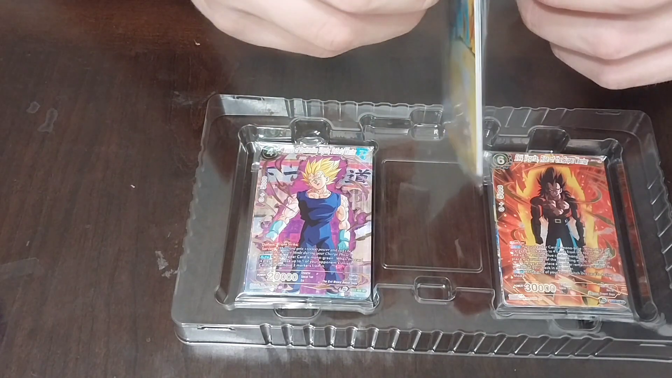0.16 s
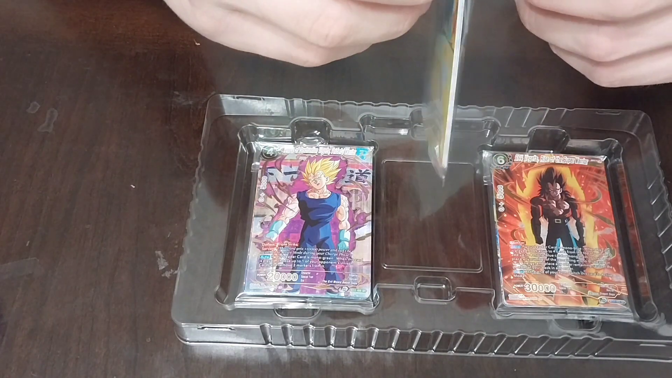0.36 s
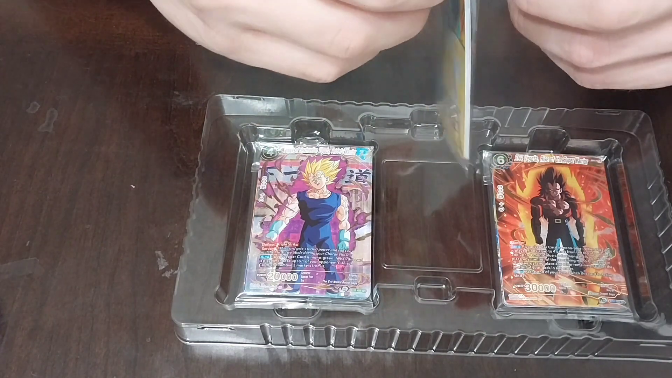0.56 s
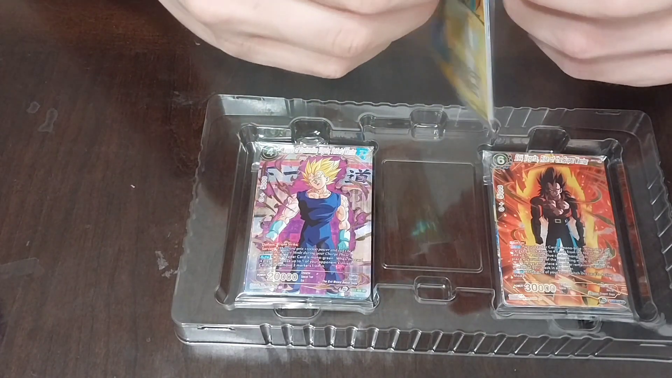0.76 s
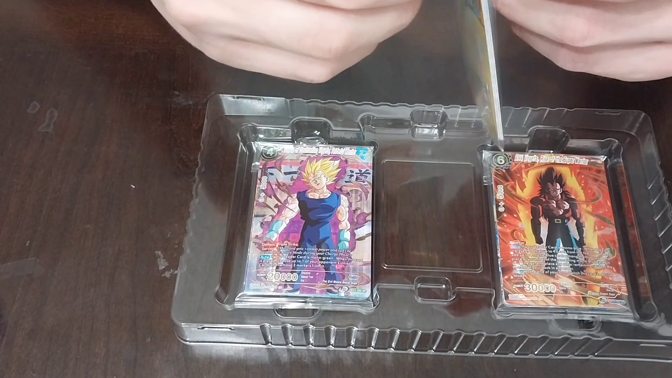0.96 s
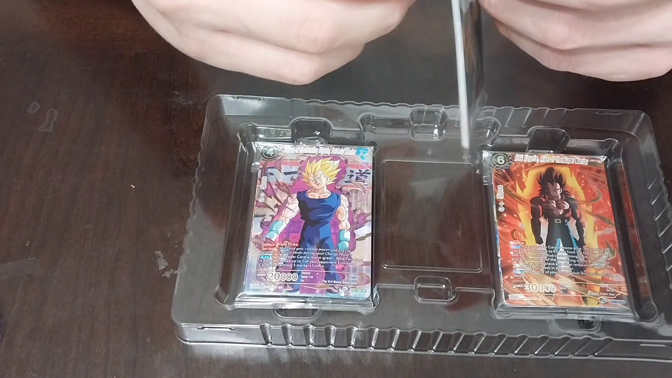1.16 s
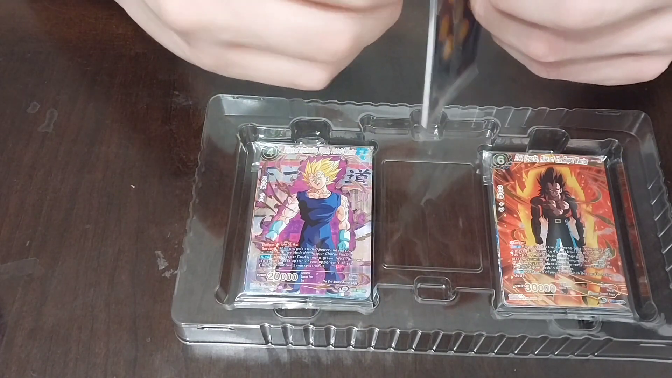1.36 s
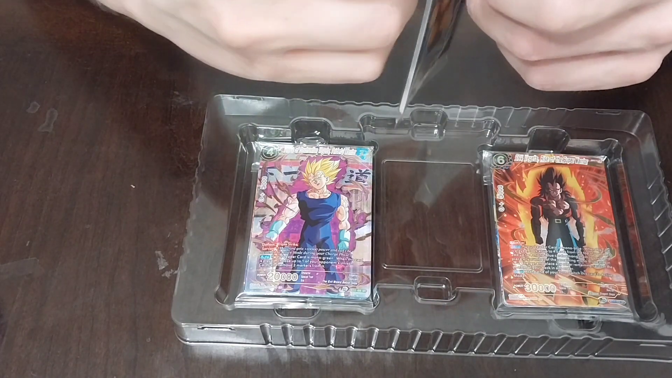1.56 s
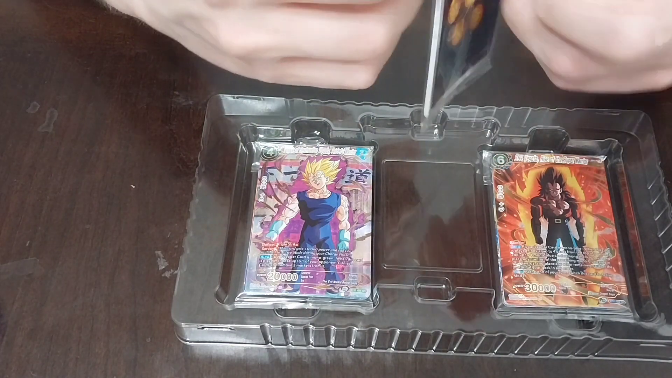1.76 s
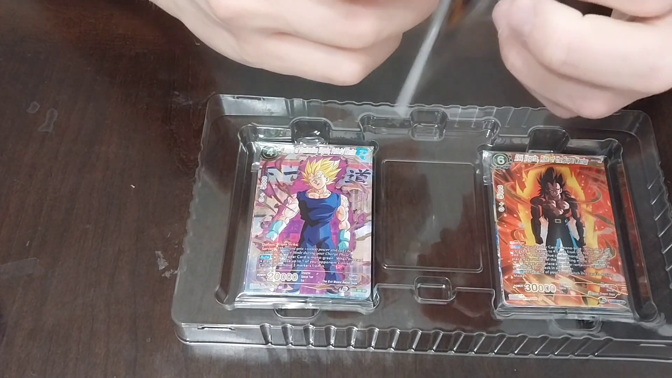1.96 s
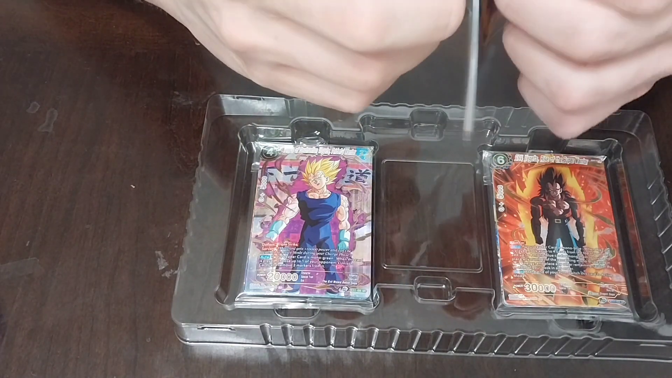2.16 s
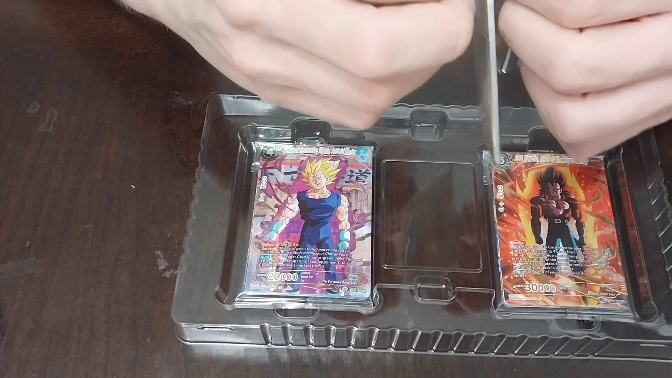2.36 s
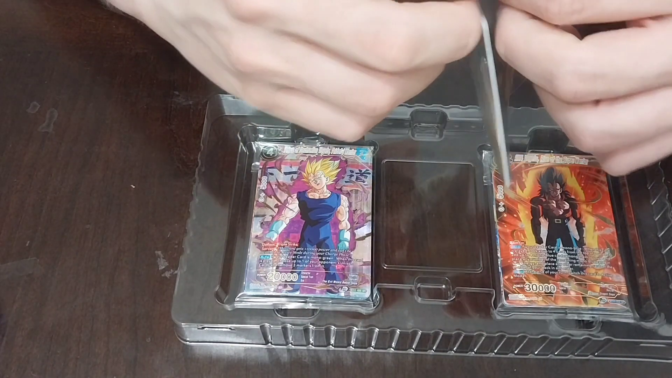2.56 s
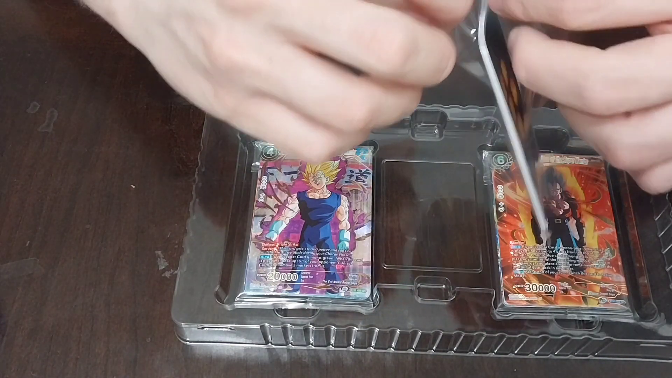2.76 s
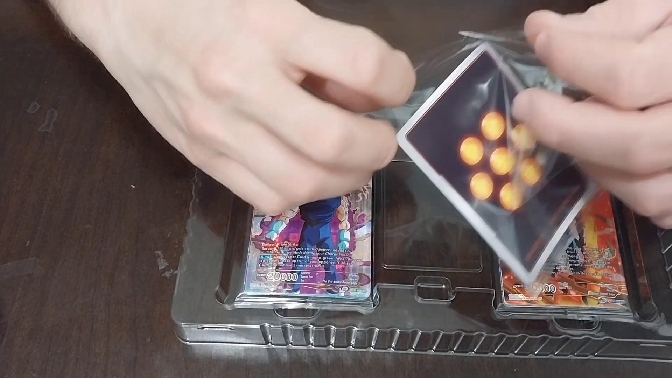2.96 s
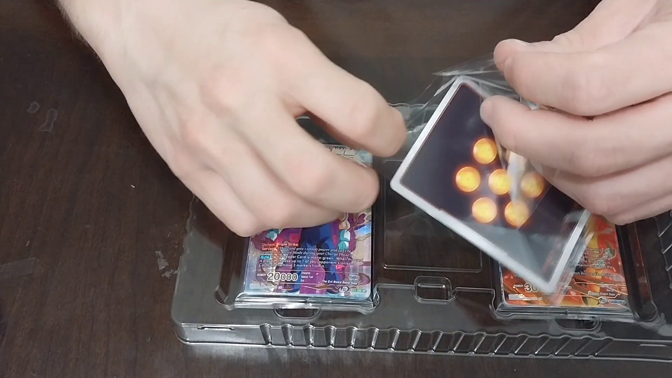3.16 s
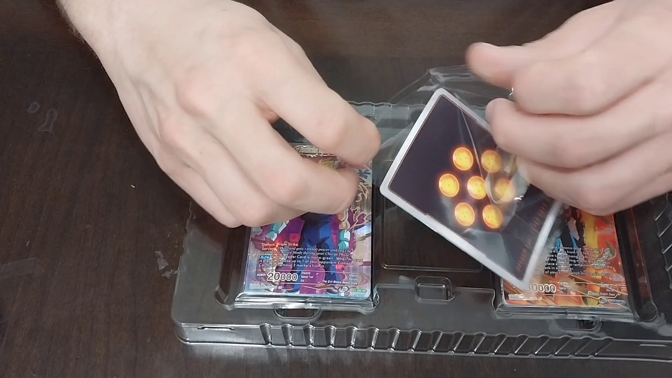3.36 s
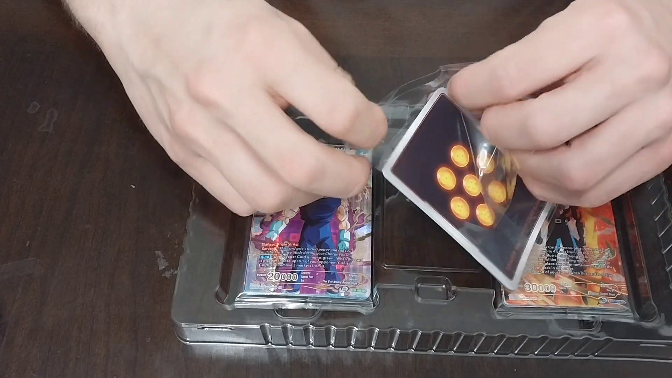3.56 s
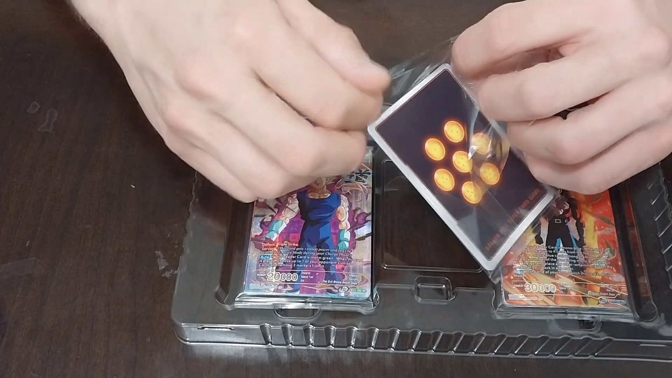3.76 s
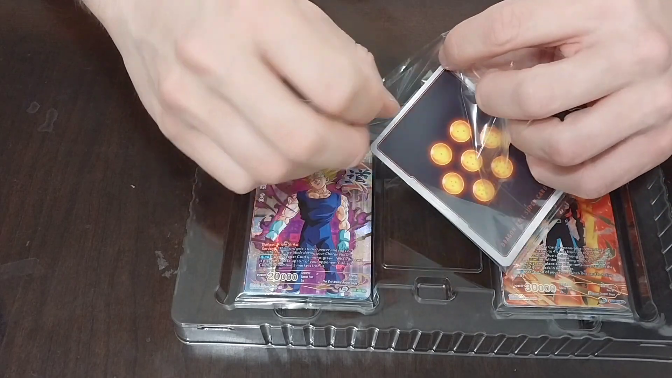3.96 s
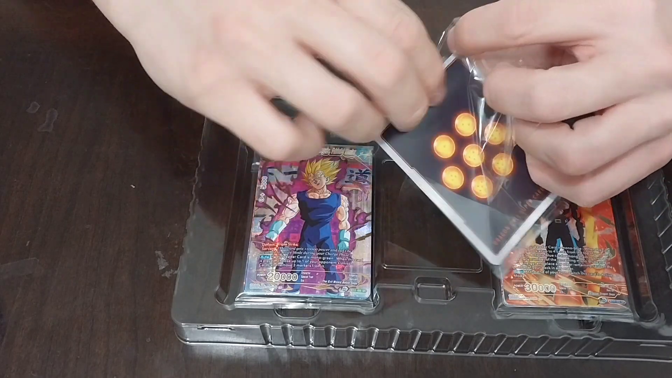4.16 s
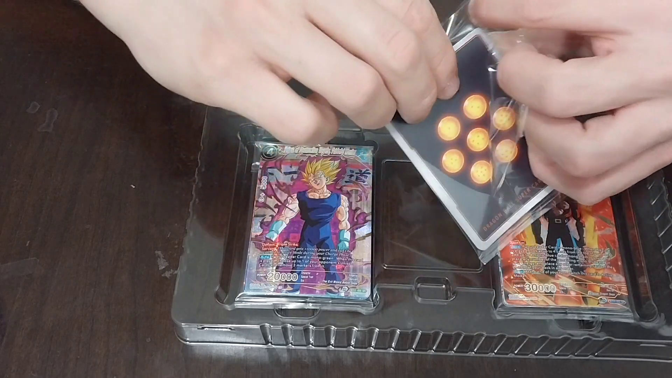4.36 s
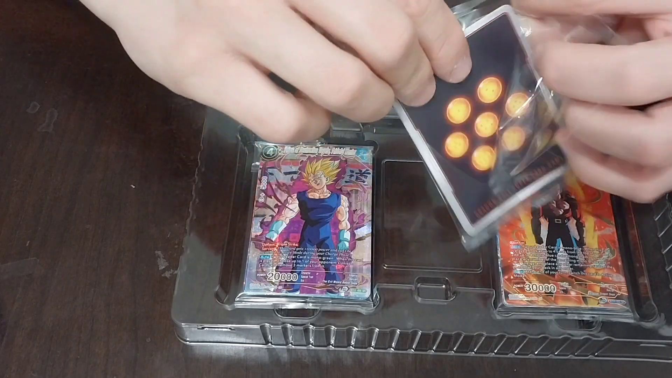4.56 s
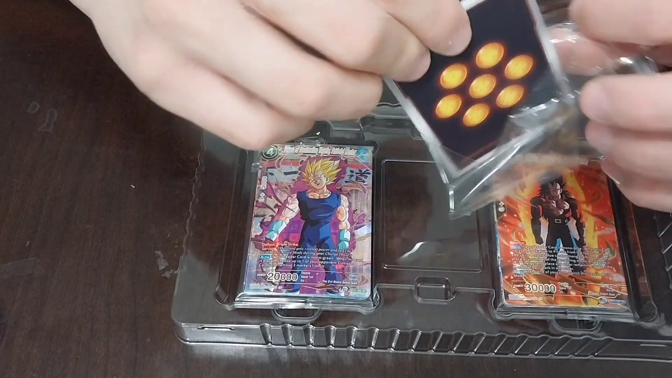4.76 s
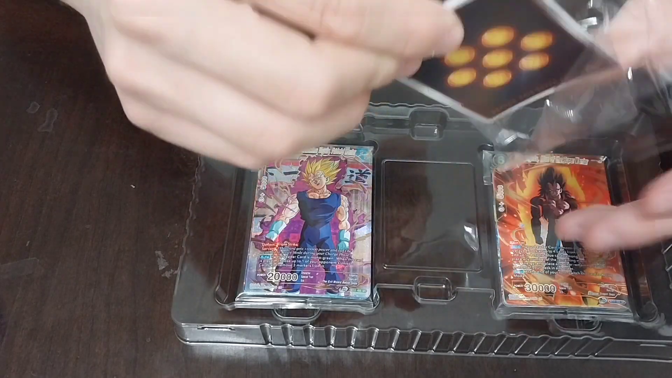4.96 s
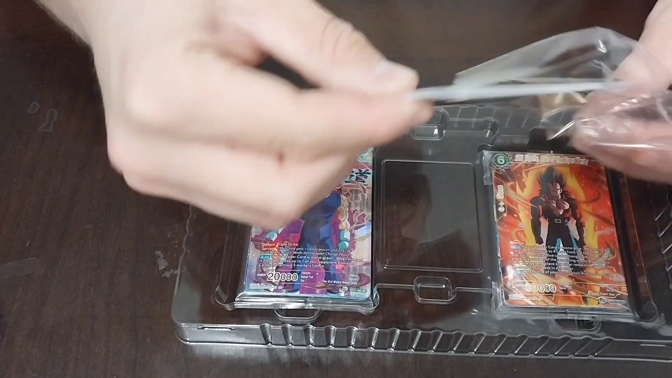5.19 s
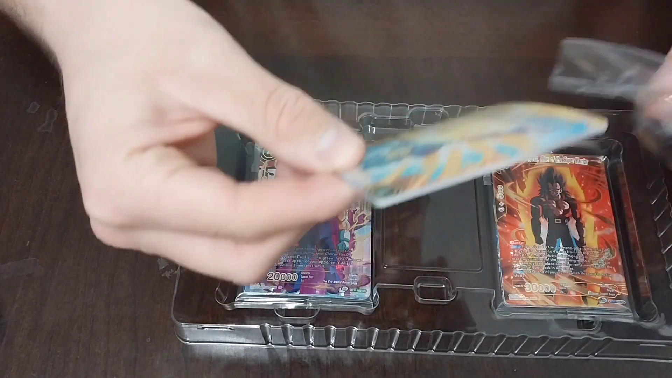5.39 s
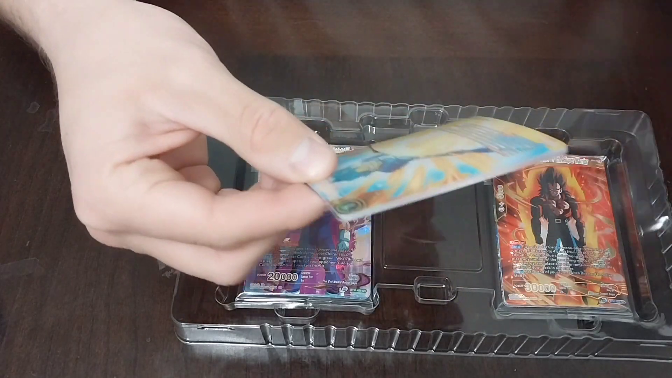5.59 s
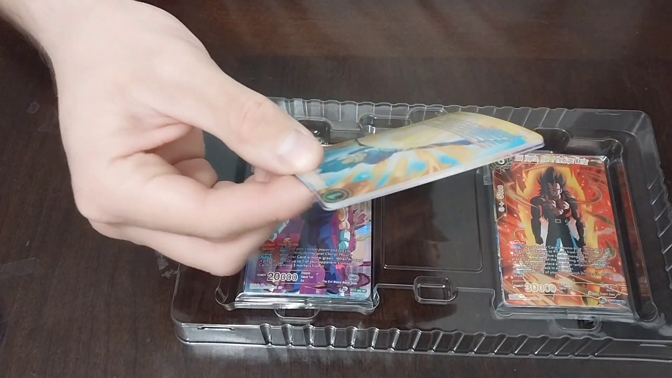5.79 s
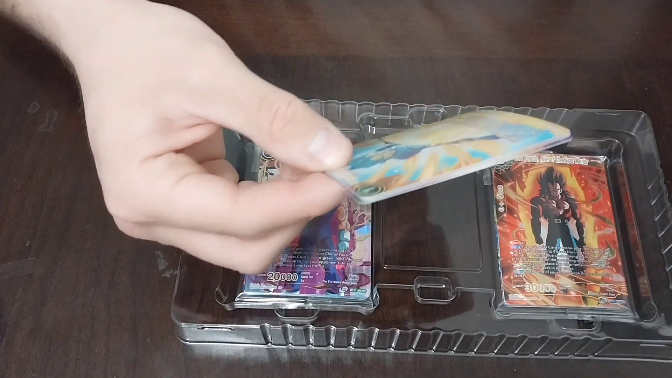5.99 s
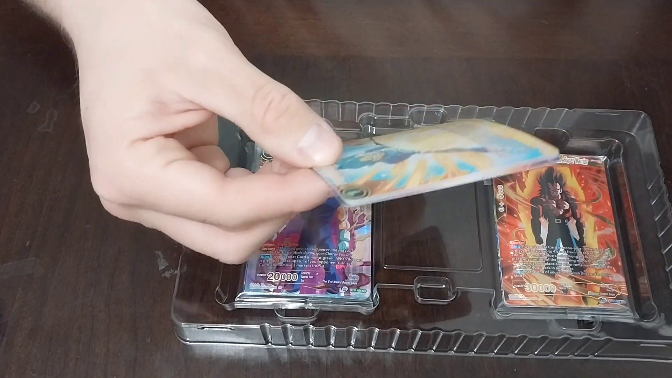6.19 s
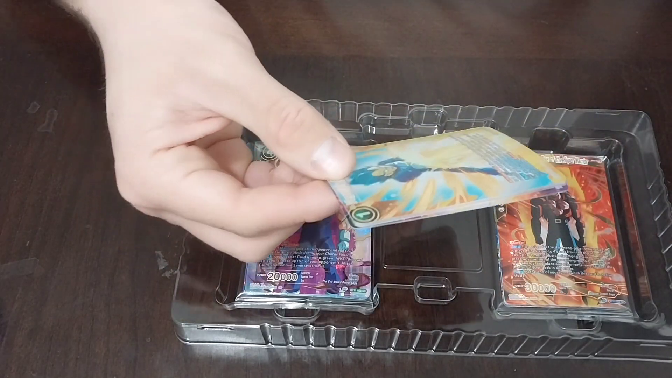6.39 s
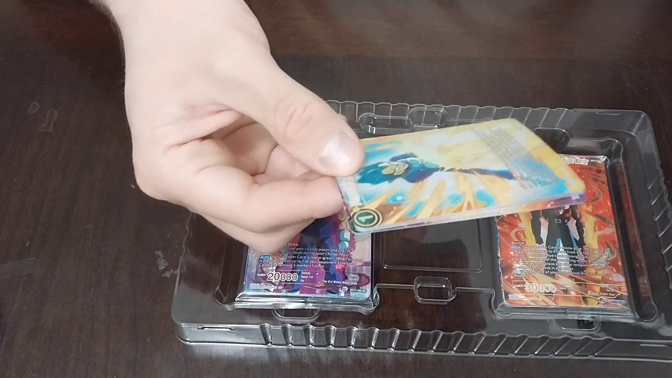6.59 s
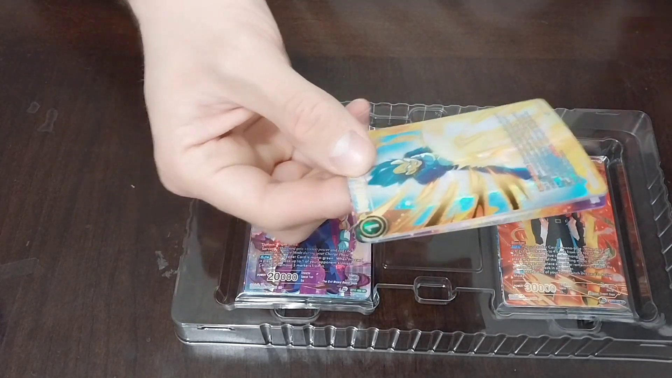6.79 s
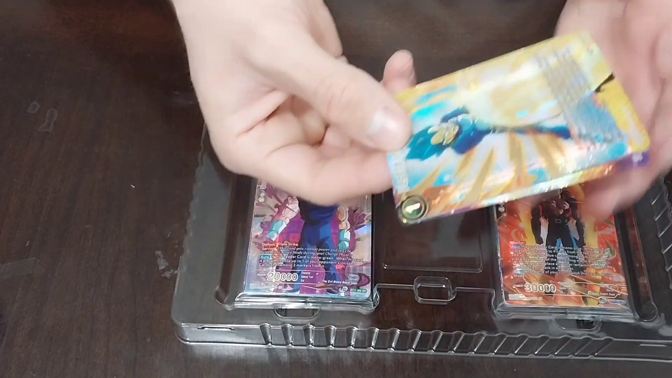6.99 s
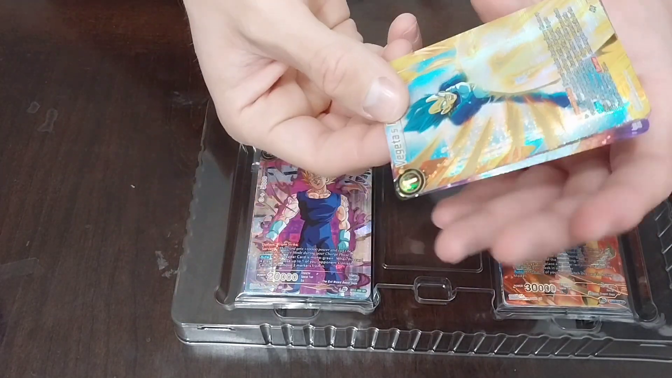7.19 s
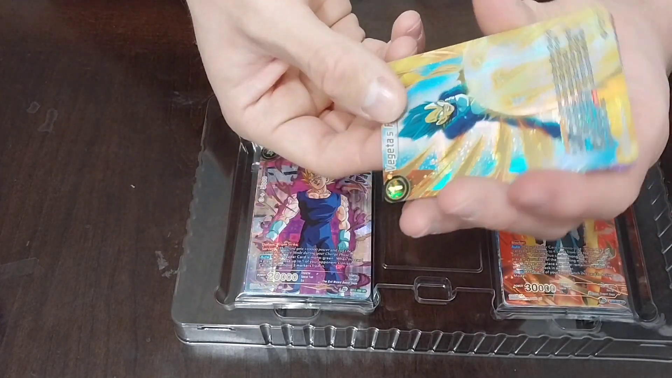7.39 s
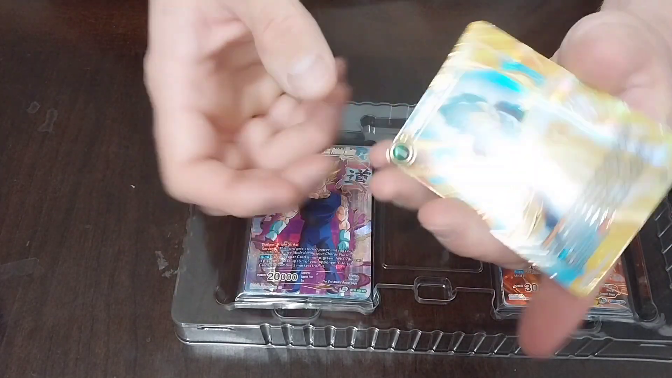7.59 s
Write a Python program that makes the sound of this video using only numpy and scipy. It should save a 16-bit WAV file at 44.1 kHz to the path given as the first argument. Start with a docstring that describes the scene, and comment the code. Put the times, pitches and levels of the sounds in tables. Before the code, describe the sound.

Stiff plastic film rustles and crackles softly, then snaps thickly as a wrapper is worked off trading cards, over a faint motor hum.

```python
"""A faint motor hum, a thin whine and soft room noise run throughout: drifting sines and shaped noise.
From the start, stiff plastic film rustles over a faint steady hiss: crackling slips ringing in many facets.
Creases snap, sparsely at first, then thickly from about 1.6 s: noise bursts with one ringing facet each.
From then on a few dull bumps of hand and wrapper join in: swelling, dying noise through resonances.
The film grows quiet as the trading cards are out and the wrapper is put aside; a small room reflects it all."""
import sys
import numpy as np
from scipy import signal
from scipy.fft import rfft, irfft
from scipy.io import wavfile
from scipy.ndimage import uniform_filter1d

SR = 44100
rng = np.random.default_rng(int(sys.argv[2]) if len(sys.argv) > 2 else 0)


def unload_audio(sound):
    """Save the sound as a 16-bit wav file, at the path given as the first command line argument."""
    columns = np.transpose(np.atleast_2d(sound))
    # keep every value between -1 and 1, then stretch to whole-number steps
    steps = np.round(np.clip(columns, -1, 1) * 32767)
    wavfile.write(sys.argv[1], SR, steps.astype(np.int16))


N = 336913
TIME = np.arange(N) / SR


def from_db(db):
    """Decibels to gain."""
    return 10 ** (np.asarray(db) / 20)


def unit_rms(x):
    """Scale to rms 1."""
    return x / np.sqrt(np.mean(x ** 2) + 1e-20)


def unit_energy(x):
    """Scale every stereo burst to a mean energy of 1 per channel."""
    energy = np.sum(x ** 2, axis=-1, keepdims=True).mean(axis=-2, keepdims=True)
    return x / np.sqrt(energy + 1e-20)


def band(x, low_hz, high_hz, order=3):
    """Causal band-pass."""
    edges_hz = [low_hz, min(high_hz, .45 * SR)]
    return signal.sosfilt(signal.butter(order, edges_hz, "band", fs=SR, output="sos"), x)


def high_pass(x, hz):
    """Causal second-order high-pass."""
    return signal.lfilter(*signal.butter(2, np.clip(hz, 20, .45 * SR), "high", fs=SR), x)


def resonance(x, hz, q):
    """One resonance, gain 1 on top."""
    return signal.lfilter(*signal.iirpeak(min(hz, .45 * SR), q, fs=SR), x)


def at_hz(table, hz, axis=1):
    """Read a table column on a log-frequency axis."""
    table = np.array(table)
    return np.interp(np.log(hz + 1e-9), np.log(table[:, 0]), table[:, axis])


def stereo(pair, alike):
    """Two unrelated signals become left and right with a given likeness."""
    alike = np.clip(alike, -.99, .99)
    mid = np.sqrt((1 + alike) / 2) * pair[0]
    side = np.sqrt((1 - alike) / 2) * pair[1]
    return np.array([mid + side, mid - side])


def sides(pan_db):
    """Left and right gains for a level difference; negative leans right."""
    return from_db(pan_db * np.array([[.5], [-.5]]))


def drift(per_s):
    """Slow random wander with a spread near 1, through per_s random points a second."""
    knots = rng.standard_normal(4000)
    return np.interp(TIME * per_s, np.arange(len(knots)), knots)


# partials of the motor hum: pitch_hz [Hz], level_db [dB rms, before the drift]
HUM_PARTIALS = [(59.2, -80), (118.4, -72.5), (179.2, -63), (358, -78.5), (414.5, -78)]
# bands of the thin steady whine: pitch_hz [Hz], width_hz [Hz, half the bandwidth of each filter pass],
# level_db [dB rms]
WHINE_BANDS = [(2920, 23, -89), (5540, 900, -88), (6700, 130, -91), (7100, 600, -82.5)]
# spectrum of the still room: freq_hz [Hz], density_db [dB per Hz, relative]
AIR_SPECTRUM = [(20, -28), (50, -3.5), (85, -13), (105, 2), (150, -8), (200, -4), (360, -9.5), (550, -19.5),
                (950, -29.5), (2300, -37.5), (4200, -51.5), (7000, -42), (15000, -41.5)]
AIR_DB = -64  # overall rms, before panning
# left-right likeness of the still room: freq_hz [Hz], likeness [0-1]
AIR_LIKENESS = [(60, .78), (200, 0.53), (500, 0.25), (2000, 0.18), (10000, .1)]


def background(pan_db=-2):
    """A motor's drifting sine partials and a whine of narrowed noise over the room's rumble and hiss."""
    hz = np.arange(N // 2 + 1) * SR / N
    spectrum = stereo(rfft(rng.standard_normal((2, N))), at_hz(AIR_LIKENESS, hz))
    air = from_db(AIR_DB) * unit_rms(irfft(spectrum * from_db(at_hz(AIR_SPECTRUM, hz)), N))
    hum = 0
    for pitch_hz, level_db in HUM_PARTIALS:
        wander = from_db(.7 * drift(6))
        tone = wander * np.sin(2 * np.pi * pitch_hz * TIME + .3 * drift(5))
        hum = hum + np.sqrt(2) * from_db(level_db) * tone
    white = rng.standard_normal((2, N))
    whine = 0
    for pitch_hz, width_hz, level_db in WHINE_BANDS:
        q = pitch_hz / (2 * width_hz)
        narrowed = resonance(resonance(white, pitch_hz, q), pitch_hz, q)
        whine = whine + from_db(level_db) * unit_rms(narrowed)
    return air * sides(pan_db) + hum + whine


# rustle of the film: longer slides, with brief crackling bursts and tails around snaps:
# start_s [s], length_s [s], level_db [dB, before register trims],
# depth_db [dB, higher brings out the lows]
RUSTLES = [(0.0, 0.088, -66, -10.5), (0.23, .16, -71.5, -10.5), (0.429, 0.054, -56, -12.5),
           (0.684, .13, -77, -17.5), (0.92, 0.051, -67.5, -2.5), (1.177, 0.05, -81, -30),
           (1.325, 0.079, -65.5, -6.5), (1.523, .08, -58, -10), (1.643, 0.051, -32, -8.5),
           (1.703, 0.059, -45.5, -14.5), (1.78, 0.049, -47, -5), (1.964, .06, -51.5, -9.5),
           (2.10, 0.26, -57.5, -5.5), (2.298, .07, -53.5, -7.5), (2.44, 0.034, -56, 2),
           (2.495, 0.012, -45, -12.5), (2.57, 0.15, -59, -7.5), (2.76, .06, -43.5, -8),
           (2.834, 0.037, -39.5, -6.5), (2.909, 0.0081, -36, -6), (2.946, 0.005, -33.5, -2.5),
           (2.984, .05, -48, -10), (3.088, 0.062, -64, -1), (3.237, 0.07, -60, -4),
           (3.336, 0.025, -57.5, 5.5), (3.429, 0.022, -51.5, -2), (3.621, .09, -55.5, -2.5),
           (3.75, .04, -64, -6), (3.869, .07, -67, 4.5), (3.975, .04, -53, -7.5), (4.1, 0.04, -50, -3),
           (4.175, 0.12, -61.5, -7), (4.372, .17, -56, -7), (4.588, .14, -55, -7),
           (4.756, 0.024, -46, -1.5), (4.861, .08, -68.5, 3), (4.984, .17, -64.5, -2),
           (5.185, 0.11, -59.5, -7.5), (5.286, .02, -48, -10), (5.307, 0.011, -42, -6),
           (5.364, 0.021, -58.5, -14.5), (5.553, .035, -74, -35.5), (5.87, .045, -67, -19.5),
           (6.095, 0.1, -63, -3), (6.179, 0.043, -57.5, 1), (6.375, .035, -75, -27),
           (6.507, .05, -65, -10.5), (7.308, 0.026, -84.5, -21)]
# share of a rustle's depth that reaches each register, body to sparkle: share [ratio]
DEPTH_SHARES = [1.4, 0.71, -0.27, -0.32]
# a rustle swells, eases off while it lasts, then stops
ATTACK_DB_PER_S, SAG_DB_PER_S, RELEASE_DB_PER_S = 900.5, 14, 398.5
# a faint steady hiss lies under the rustles and fades late on
HISS_FLOOR_DB, HISS_FADE_START_S, HISS_FADE_DB_PER_S = -88, 6.55, 17.5


def rustle_levels():
    """Level in dB of each register over time; the strongest of the rustles and the faint hiss sets it."""
    start_s, length_s, level_db, depth_db = np.transpose(RUSTLES)
    t = TIME[::40]  # a coarse grid is enough for slow levels
    age = t - start_s[:, None]
    attack_db = ATTACK_DB_PER_S * np.minimum(age, 0)
    sag_db = SAG_DB_PER_S * np.maximum(age, 0)
    release_db = RELEASE_DB_PER_S * np.maximum(age - length_s[:, None], 0)
    shape_db = attack_db - sag_db - release_db
    hiss_db = HISS_FLOOR_DB - HISS_FADE_DB_PER_S * np.maximum(t - HISS_FADE_START_S, 0)
    levels = []
    for share in DEPTH_SHARES:
        rustles_db = (shape_db + (level_db + share * depth_db)[:, None]).max(axis=0)
        floor_db = hiss_db + share * depth_db.min()
        levels.append(np.interp(TIME, t, np.maximum(rustles_db, floor_db)))
    return levels


def crackle(per_s=400, facet_db=8, facet_q=6, count=10):
    """Countless tiny slips of uneven size, each ringing one of the film's facets; two unrelated channels."""
    spread_db, largest_db, grain_s = 6.5, 17, .0011
    sizes = from_db(np.minimum(spread_db * rng.exponential(1, N), largest_db))
    slips = (rng.random(N) < per_s / SR) * sizes ** 2
    facet_of_slip = rng.integers(0, count, N)
    noise = rng.standard_normal((2, N))
    grain_decay = np.exp(-2 / (grain_s * SR))  # power decays twice as fast as amplitude
    out = 0
    for k, hz in enumerate(np.geomspace(680, 13000, count)):
        power = signal.lfilter([1], [1, -grain_decay], slips * (facet_of_slip == k) + 1e-12)
        # shifting the noise gives every facet its own stretch
        grains = np.sqrt(power) * np.roll(noise, k * N // count, axis=1)
        out = out + grains + from_db(facet_db) * resonance(grains, hz, facet_q)
    return unit_rms(out)


# body, crack, tick and sparkle registers of the film, shared by rustles and snaps:
# low_hz [Hz], high_hz [Hz], likeness [0-1, left to right]
REGISTERS = [(469, 795, 0.92), (1130, 2436, 0.76), (3360, 9190, 0.11), (8340, 14700, 0.017)]


def rustling(body_db=-3.0, crack_db=-0.5, tick_db=1.37, sparkle_db=2.0, smooth_db=-12, pan_db=-1.4):
    """Rustling film: crackling slips over a little smooth noise, in four registers."""
    body, crack, tick, sparkle = rustle_levels()
    # in a loud rustle the slips run together into a rush
    rush_db = np.clip(.6 * (tick + 49), 0, 14)
    smooth = from_db(smooth_db + rush_db)
    # the faintest rustle crackles less and hisses more
    grip = np.interp(tick, [-77, -63], [.3, 1])
    slips = grip * crackle() + smooth * rng.standard_normal((2, N))
    slips = slips / np.sqrt(grip ** 2 + smooth ** 2)
    levels_db = [body + body_db, crack + crack_db, tick + tick_db, sparkle + sparkle_db]
    out = 0
    for (low_hz, high_hz, alike), level_db in zip(REGISTERS, levels_db):
        register = unit_rms(stereo(band(slips, low_hz, high_hz), alike))
        # the level curve, not the luck of the slips, sets the slow level
        slow_power = uniform_filter1d(np.mean(register ** 2, axis=0), size=1800) + .1
        out = out + from_db(level_db) * register / np.sqrt(slow_power)
    return out * sides(pan_db)


# creases buckling: start_s [s], level_db [dB, strength before register trims and facet lift],
# depth_db [dB, the larger the patch of film, the lower its crack],
# knock_db [dB, on the card behind], ring_hz [Hz, pitch of the facet]
CREASES = [(0.03, -44.5, -12.5, -31, 2110), (0.0372, -42.5, -16, -43, 6700),
           (0.08, -54.5, -10, -33, 13160.0), (0.1882, -38.0, -32, -52, 6800), (0.4297, -33, -14, -30, 3630),
           (0.6991, -61, -34, -25, 5940), (0.718, -65.5, -4.5, -15, 6020.0), (0.91, -44.5, -7.5, -40, 6760),
           (1.0297, -53.5, -10.5, -24, 6100), (1.178, -67, -37, -17, 6400),
           (1.311, -45.5, -15.5, -42, 13300), (1.3764, -46.5, -23.5, -30.5, 6500),
           (1.4, -52, -12, -22, 7000), (1.5135, -55, -6, -8, 1250), (1.5307, -45.5, -12, -40.5, 6100),
           (1.6003, -42, -13, -12, 6390.0), (1.6162, -31.5, -24, -27.5, 13200),
           (1.6356, -35, -9, -22.5, 6980.0), (1.6457, -27.5, -14.5, -14, 5300),
           (1.6602, -28.5, -16.5, -16.5, 4350.0), (1.6787, -27.5, -47.5, -16.5, 5170),
           (1.6941, -43, -18.5, -29, 4760.0), (1.7046, -37, -12, -1, 5100), (1.7174, -44, 1, -3, 5680.0),
           (1.7413, -35.5, -3.5, -8.5, 4100.0), (1.7511, -33, -8, -32, 5000), (1.791, -42, -9, 4, 5000),
           (1.8203, -39, -3, -8, 5260), (1.8597, -44.0, 0, -24, 4720), (1.881, -44.5, -9, -27, 5440),
           (1.981, -39.5, 0, -31, 4000), (2.037, -35.5, -7.5, -22, 5600), (2.094, -43.0, -12, -20, 13670),
           (2.1079, -44.5, -18, -11, 3540.0), (2.1143, -40.5, -7, -20, 6740),
           (2.141, -46.5, -10, -12, 5200.0), (2.2077, -37.5, -12, -10.5, 12500),
           (2.2647, -43, -10, -17, 3040), (2.278, -46.5, -5, -27, 1840), (2.3042, -40.5, -8.5, -15.5, 3670),
           (2.3534, -33, -8.5, -37.5, 3400), (2.4215, -34.5, -5.5, -21.5, 6600),
           (2.4972, -43.5, -4, -5.5, 5600), (2.567, -45, -14, -16, 6170),
           (2.6198, -45.5, -6.5, -20.5, 4040), (2.682, -49, -7, -19, 2170),
           (2.7115, -38.5, -4.5, -22.5, 6200), (2.7518, -32.0, -6.5, -32.5, 13700),
           (2.8217, -45.5, 1.5, -8, 3200), (2.8805, -31.5, -7, -20, 13100),
           (2.9145, -25.5, -3.5, -13, 2030), (2.951, -32.5, 3.5, -20, 1770), (3.041, -48.5, -4, 2, 1270),
           (3.0941, -68, 14, 20.5, 1300.0), (3.1088, -47, -4, -15, 1980), (3.273, -44, -3, -8, 5040.0),
           (3.314, -42, -21, -40, 11890.0), (3.3224, -37.5, -2.5, -0.5, 4270),
           (3.415, -44, -7.5, -3, 1550.0), (3.4424, -34, -3, -10.5, 1890), (3.456, -35.5, -3, -0.5, 4300),
           (3.4718, -42, -0.5, -1.5, 4670), (3.595, -56.5, -10, -4, 4730),
           (3.6189, -47.5, -18, -24.5, 4300), (3.6333, -37, -2, -12, 5600), (3.691, -52, 13.5, 11.5, 3100),
           (3.7188, -43.5, -36, -26.5, 5400), (3.755, -47, -2, -28.5, 4760.0),
           (3.783, -51, 0, -6.5, 5850.0), (3.8865, -45.5, -4, -10.5, 5400),
           (3.918, -40.5, -1.5, -3.5, 4370), (3.972, -26.5, -5.5, -24.5, 2090),
           (4.0607, -43.5, -3.5, -6.5, 4400), (4.1028, -31.5, -12, -18, 13600), (4.1405, -55, 9.5, 7, 2200),
           (4.1824, -45.0, -8, -11, 1980), (4.2374, -44.5, -14, -22, 11890.0), (4.2608, -44, -9, -23, 4900),
           (4.3702, -50, -15, -23, 6390.0), (4.4184, -45.5, -26, -35, 4970), (4.4285, -34, -4, -20.5, 4130),
           (4.5348, -38.5, -8, -31, 3800), (4.5668, -50, -9.5, -10.5, 4260), (4.585, -52, -6, -19, 6700),
           (4.5957, -34, -5.5, -21, 4480.0), (4.617, -33.5, -6, -19.5, 6400),
           (4.6563, -37.5, -19, -19, 6930), (4.6684, -38, 5, -17.5, 3440.0), (4.7067, -32, -3, -11, 6850),
           (4.7424, -31, -8, -25, 5350.0), (4.755, -30.0, -9, -11, 4900.0),
           (4.779, -27.5, -5.5, -8.5, 5200.0), (4.8329, -33.5, -10, -21, 13600),
           (4.8468, -36.5, -4.5, -9, 4860), (4.9204, -52, 3, -14, 1310), (4.9798, -37, -9.5, -19, 13400),
           (5.0706, -44.5, -5, -11, 4900), (5.1043, -56, 2, 7, 4700), (5.133, -44, 0, -11, 2670),
           (5.1414, -47.5, -10, -31, 3080), (5.3059, -44.5, 0.5, -2, 1550), (5.3164, -42.0, -19, -13, 4370),
           (5.6545, -49.5, -10.5, -20, 6580.0), (5.7531, -58, -18.5, -33, 5040.0),
           (5.774, -52.0, -19, -22, 3670), (5.885, -51.5, -22, -19, 6840), (6.167, -49, -5, -3, 6500),
           (6.437, -56, -10, -20, 6200.0), (6.5068, -58, -10, -31, 6980.0)]
# a buckling crease sets off small neighbours: mean wait, loss per step
CHAIN_WAIT_S, CHAIN_LOSS_DB = .007, 14


def buckles(count=2):
    """Every crease, followed by a short chain of weaker neighbours with facets of their own."""
    chance = rng.random((len(CREASES), count, 2))
    rows = []
    for (s, level_db, depth_db, knock_db, ring_hz), draws in zip(CREASES, chance):
        rows.append((s, level_db, depth_db, knock_db, ring_hz))
        for step, (wait, facet) in enumerate(draws, 1):
            s = s + CHAIN_WAIT_S * (.5 + wait)
            weaker_db = level_db - step * CHAIN_LOSS_DB
            rows.append((s, weaker_db, depth_db, knock_db, ring_hz * 2 ** (facet - .5)))
    return np.array(rows)


# the register that a ringing facet lies in is lifted: amount, reach in octaves
FACET_LIFT_DB, FACET_REACH_OCT = 4, 0.8


def snap_levels(rows):
    """Knock feeds the body, depth the crack, and the facet lifts its own register."""
    _, level_db, depth_db, knock_db, ring_hz = rows.T
    centres = np.array([np.sqrt(low * high) for low, high, _ in REGISTERS])
    octaves = np.log2(ring_hz[:, None] / centres)
    lift_db = FACET_LIFT_DB * np.exp(-(octaves / FACET_REACH_OCT) ** 2)
    return np.transpose([level_db + knock_db, level_db + depth_db, level_db, level_db]) + lift_db


# a facet radiates little below its own ring: corner as a share of the ring pitch, highest corner
THIN_SHARE, THIN_TOP_HZ = .72, 4600


def snaps(flutter_db=-13, facet_db=8, facet_fall_db=-8, pan_db=-1.4,
          body_db=1.5, crack_db=1.2, tick_db=4.13, sparkle_db=6.0, size=900):
    """A crease flips within a millisecond; the film around it flutters and one facet rings."""
    flip_s, bounce_s, bounce_gain, flutter_s, facet_q = .00034, .0015, .55, .0035, 4
    t = np.arange(size) / SR
    rows = buckles()
    ring_hz = rows[:, 4]
    noise = rng.standard_normal((len(rows), 2, size))
    flip = (t / flip_s) * np.exp(1 - t / flip_s)
    # the flip comes back at once from the table top
    bounce = bounce_gain * np.interp(t - bounce_s, t, flip)
    flutter = from_db(flutter_db) * np.exp(-t / flutter_s)
    bursts = noise * (flip + bounce + flutter)
    # large, low facets ring most: the ring weakens with every octave, from facet_db at 2 kHz
    rings = from_db(facet_db + facet_fall_db * np.log2(ring_hz / 2000))
    bursts = np.array([b + ring * resonance(b, hz, facet_q) for b, hz, ring in zip(bursts, ring_hz, rings)])
    # the knock on the card keeps its lows; the film's own sound is thinned
    thin = np.array([high_pass(b, min(THIN_SHARE * hz, THIN_TOP_HZ)) for b, hz in zip(bursts, ring_hz)])
    levels_db = snap_levels(rows) + [body_db, crack_db, tick_db, sparkle_db]
    sources = [bursts, thin, thin, thin]
    coloured = 0
    for (low_hz, high_hz, alike), level_db, source in zip(REGISTERS, levels_db.T, sources):
        channels_first = band(source, low_hz, high_hz).swapaxes(0, 1)
        pair = stereo(channels_first, alike).swapaxes(0, 1)
        coloured = coloured + unit_energy(pair) * from_db(level_db)[:, None, None]
    # levels count as rms over five milliseconds
    coloured = coloured * np.sqrt(.005 * SR)
    out = np.zeros((2, N + size))
    for s, burst in zip(rows[:, 0], coloured):
        start = int(s * SR)
        out[:, start:start + size] += burst
    return out[:, :N] * sides(pan_db)


# dull bumps of hand and wrapper: start_s [s], thud_hz [Hz, centre], thud_db [dB],
# rattle_db [dB, hollow rattle], decay_s [s, to fall 60 dB]
BUMPS = [(1.668, 207, -49, -54, 1), (2.912, 388, -43.5, -42, 0.29), (4.769, 332, -46, -42.5, 0.35),
         (5.318, 161, -45, -51.5, 0.23), (6.189, 140, -44.5, -40.5, 0.25)]


def bumps(thud_q=1.0, rise_s=0.015, rattle_hz=1300, rattle_q=1.4, pan_db=-2.0):
    """Soft contacts swell quickly and die away: a thud and the hollow rattle of the limp wrapper."""
    rattle = resonance(stereo(rng.standard_normal((2, N)), .35), rattle_hz, rattle_q)
    rattle = unit_rms(band(rattle, 600, 3000, order=1))
    push = band(stereo(rng.standard_normal((2, N)), 0.91), 71, 530, order=2)
    out = 0
    for start_s, thud_hz, thud_db, rattle_db, decay_s in BUMPS:
        age = TIME - start_s
        rise = np.exp(np.clip(age, -1, 0) / rise_s)
        fall = from_db(-60 * np.clip(age, 0, 2) / decay_s)
        thud = unit_rms(resonance(push, thud_hz, thud_q))
        out = out + rise * fall * (from_db(thud_db) * thud + from_db(rattle_db) * rattle)
    return out * sides(pan_db)


# reverberation: freq_hz [Hz], t60_s [s, to fall 60 dB], level_db [dB], likeness [0-1, left to right]
REVERB = [(304, 0.48, -5, 0.6), (700, 0.21, -9.5, .92), (1800, 0.22, -5.5, 0.0023),
          (4070, 0.23, -6.5, 0.12), (9000, 0.28, -8.5, 0.98), (15000, 0.16, -7.5, 0)]


def room(x, first_s=0.002, size=22000):
    """Dense reflections fade in around first_s and die away band by band, as noise tails."""
    t = np.arange(size) / SR
    onset = np.clip(t / first_s - .5, 0, 1)
    edges = np.geomspace(150, 18000, 11)
    response = 0
    for low_hz, high_hz in zip(edges, edges[1:]):
        hz = np.sqrt(low_hz * high_hz)
        tail = stereo(rng.standard_normal((2, size)), at_hz(REVERB, hz, axis=3))
        tail = tail * from_db(-60 * t / at_hz(REVERB, hz)) * onset
        level = from_db(at_hz(REVERB, hz, axis=2))
        response = response + level * band(unit_energy(tail), low_hz, high_hz)
    return signal.fftconvolve(x, response, axes=1)[:, :N]


def scene():
    """The handling close by, its reflections, and the room behind."""
    handling = snaps() + rustling() + bumps()
    return handling + room(handling) + background()


# dips in the microphone's response: freq_hz [Hz], sharpness [Q], depth [0-1]
MIC_DIPS = [(8415, 16, 0.8), (9470, 4.9, 0.47)]
CUTOFF_HZ = 16200


def record(dry):
    """The microphone has dips in the treble, made by subtracting resonances; a steep low-pass cuts the top."""
    for hz, q, depth in MIC_DIPS:
        dry = dry - np.clip(depth, 0, .9) * resonance(dry, hz, q)
    return signal.sosfilt(signal.ellip(10, .2, 80, CUTOFF_HZ, fs=SR, output="sos"), dry)


dry = scene()
out = record(dry)
unload_audio(out)
```